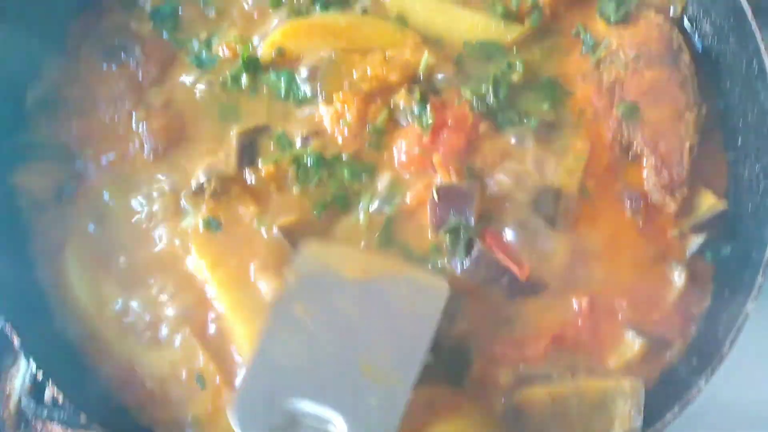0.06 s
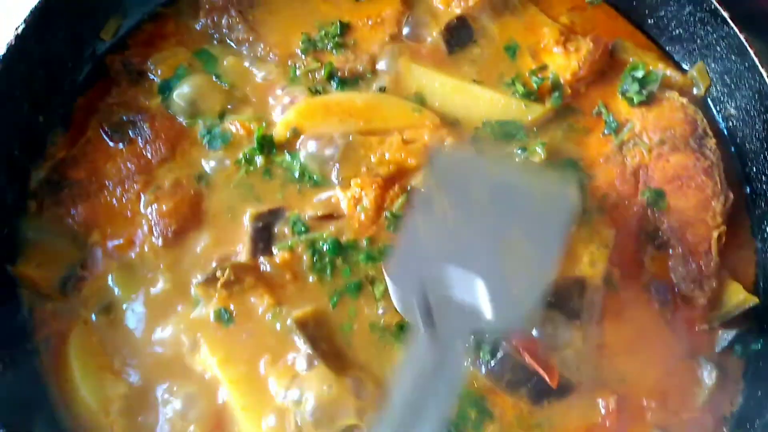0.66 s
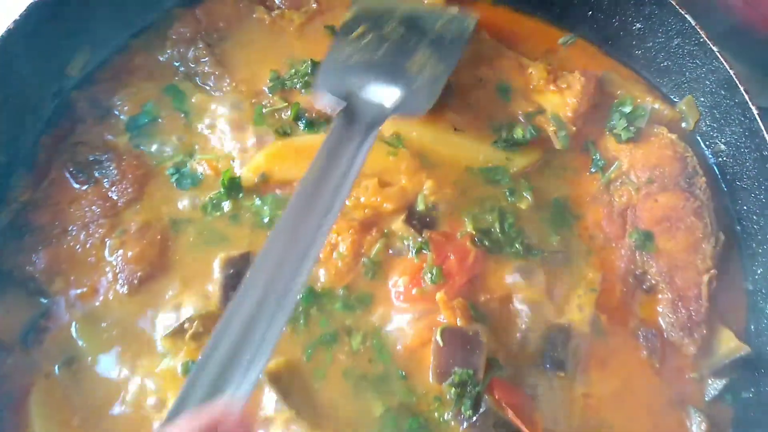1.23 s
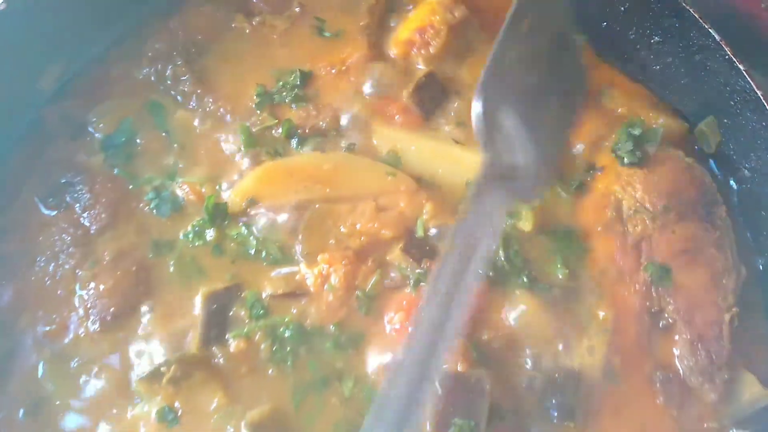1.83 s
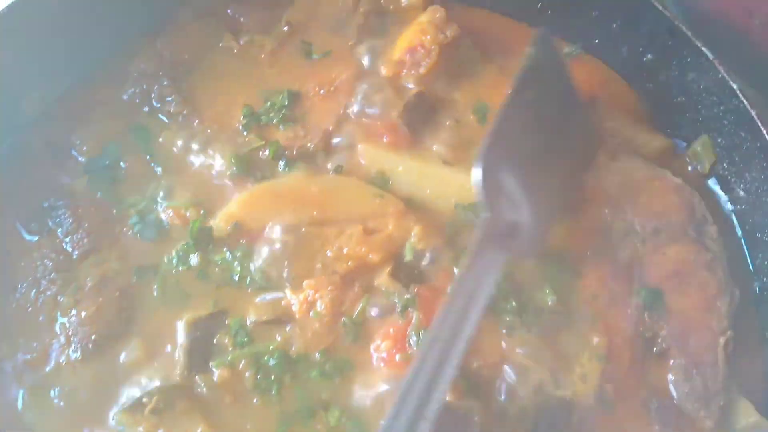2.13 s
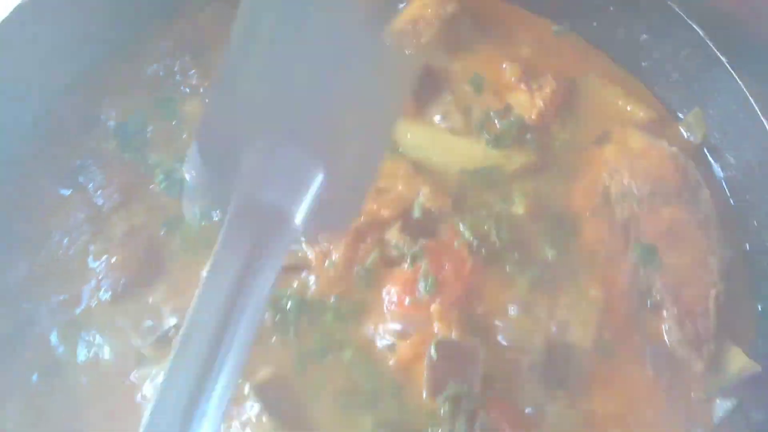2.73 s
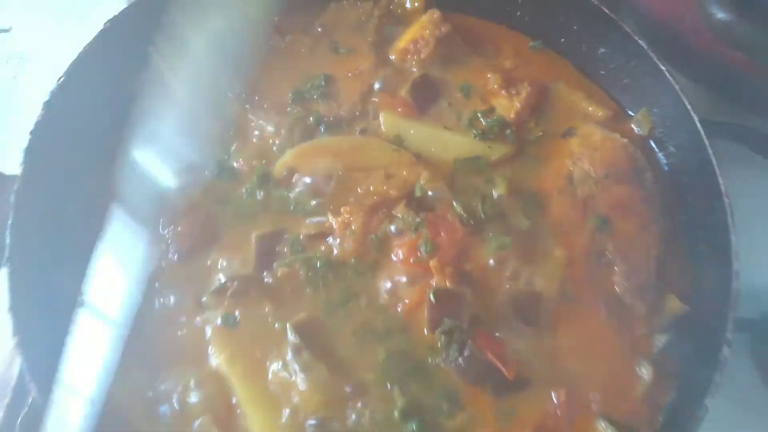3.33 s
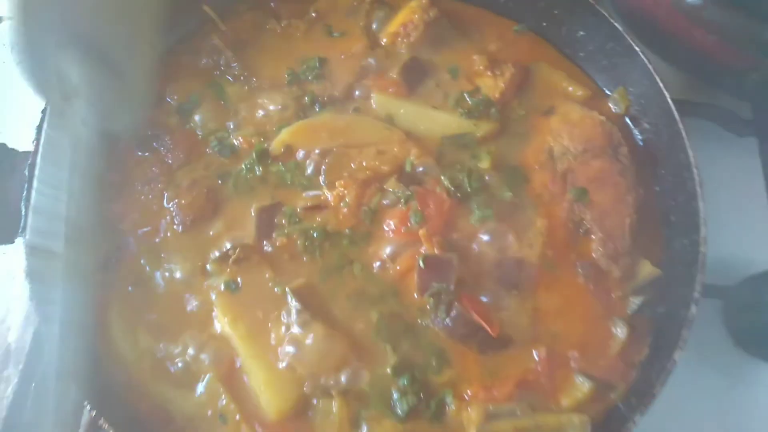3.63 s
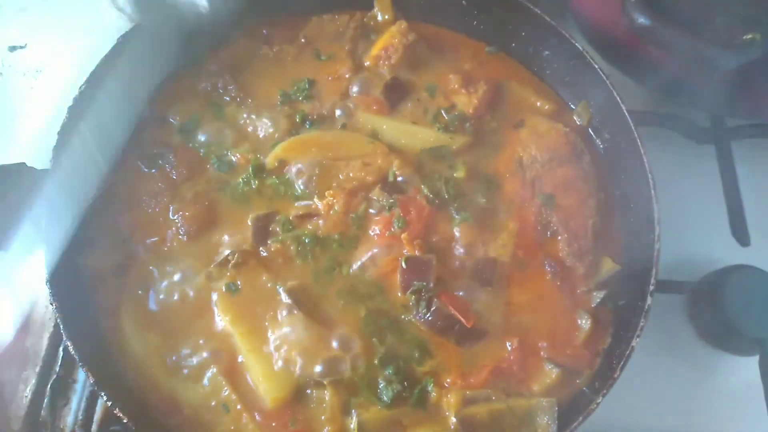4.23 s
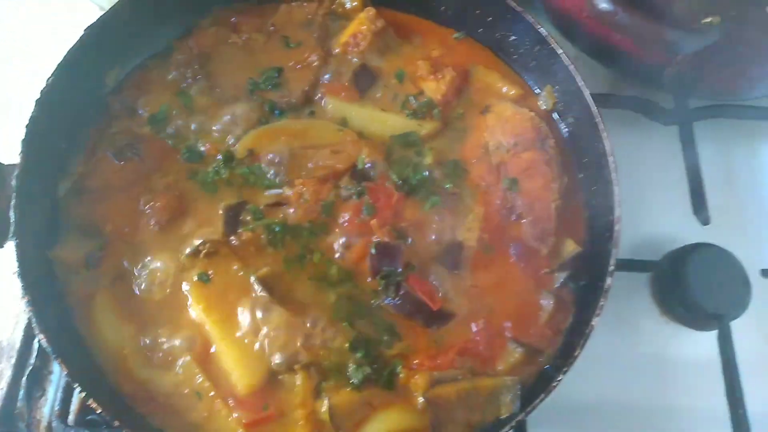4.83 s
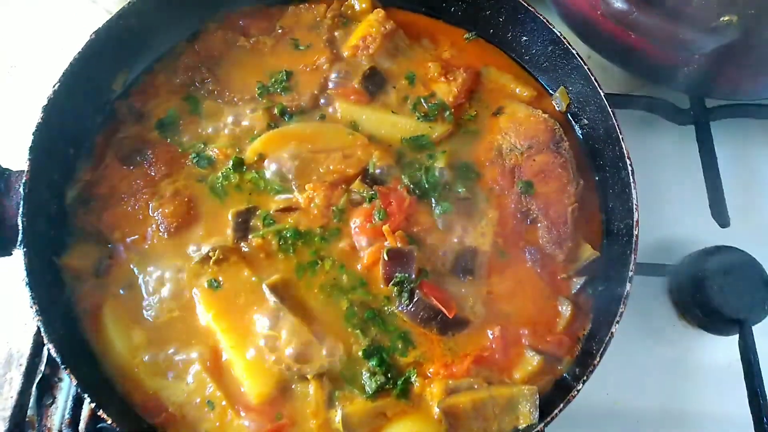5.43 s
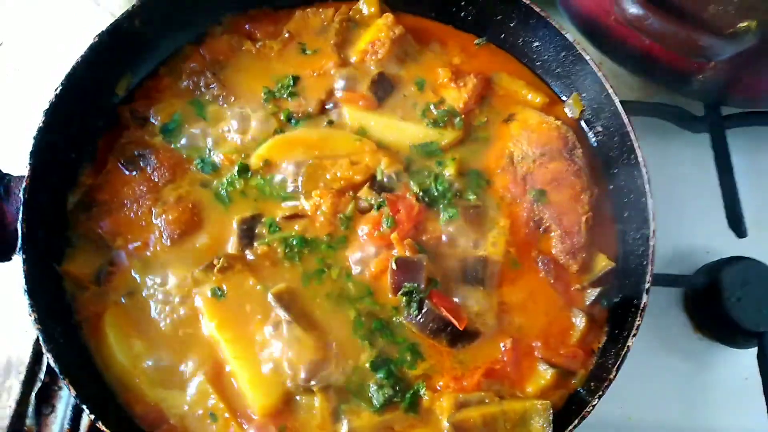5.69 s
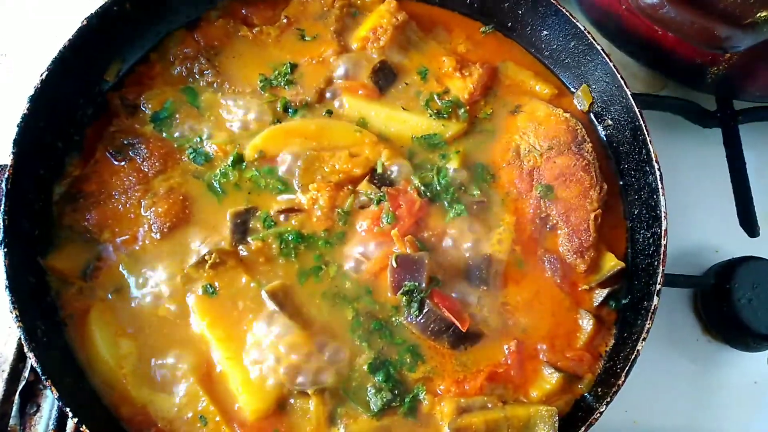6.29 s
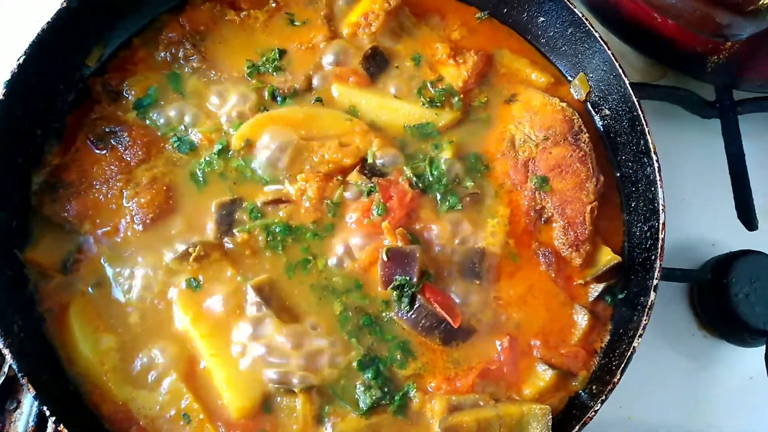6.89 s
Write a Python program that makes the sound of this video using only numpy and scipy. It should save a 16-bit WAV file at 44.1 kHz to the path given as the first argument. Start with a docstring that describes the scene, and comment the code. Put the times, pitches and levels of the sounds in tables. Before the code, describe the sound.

A thin curry simmers in a frying pan in a small kitchen, heard close on a hand-held microphone. Bubbles pop softly in the sauce while droplets spit and fizz in oil at the hot rim. After about five seconds a steel spatula is put down with a loud ringing knock and settles with a lighter click. The sizzling carries on, and sauce sputters loudly on hot metal near the end.

```python
"""Sizzling, spitting and soft bubbling: a thin curry simmers in a frying pan in a small kitchen.
Bubbles burst in the sauce while water spits and fizzes in the oil at the hot rim.
A steel spatula is put down with a ringing knock and settles. Sauce runs onto hot metal and sputters,
mildly near the start and loudly near the end. A hand-held microphone listens from close by,
through two openings (ports), left and right."""
import sys
import numpy as np
from scipy import signal
from scipy.fft import rfft, irfft
from scipy.io import wavfile

SR = 44100
rng = np.random.default_rng(int(sys.argv[2]) if len(sys.argv) > 2 else 0)


def log_audio(samples):
    """Write samples as a 16-bit WAV file to the path given in sys.argv[1]."""
    # one column per channel
    frames = np.atleast_2d(samples).T
    # limit to full scale, then quantise
    limited = np.clip(frames, -1, 1)
    pcm = np.round(limited * 32767).astype(np.int16)
    wavfile.write(sys.argv[1], SR, pcm)


N = 306484
BINS = np.fft.rfftfreq(1024, 1 / SR)  # the frequencies in Hz at which tone colours are drawn

# Three tone colours. Each row: frequency in Hz, relative level in dB.
FRYING_COLOUR = [(2000, -50.5), (4400, -21), (5300, -5.5), (6500, -0.5), (7600, 1.5), (9200, -1),
                 (10500, -5.5), (12000, -37.5), (16000, -35)]  # water frying in oil
BRIGHT_COLOUR = [(8000, -40), (11000, -2), (13000, -8.5), (15800, -12.5)]  # steam and fine droplets
SAUCE_COLOUR = [(88, -38), (150, -2), (322, -6), (451, 2), (554, -2.5), (764, 5.5), (1170, -3), (1340, 3.5),
                (2860, -3.5), (4070, -12), (4580, -29), (5000, -5.5), (6500, -30), (11000, -120)]  # bubbling sauce


def amp(db):
    """Turn decibels into a gain to multiply by."""
    return 10 ** (np.asarray(db) / 20)


def unit_power(x):
    """Scale x so that its average power is 1."""
    return x / np.sqrt(np.mean(x ** 2) + 1e-20)


def value_at(points, hz):
    """Look up a frequency between the rows of a table."""
    frequencies, values = np.transpose(points)
    return np.interp(np.log(hz + 1), np.log(frequencies + 1), values)


def level(curve):
    """Join points of (seconds, dB) into a gain for every sample."""
    return amp(np.interp(np.arange(N) / SR, *np.transpose(curve)))


def seconds(length):
    """The time of each sample in a sound this long."""
    return np.arange(int(length * SR)) / SR


def add(mix, start_s, sound):
    """Add a sound to the mix at the given time."""
    start = round(start_s * SR)
    part = mix[:, max(start, 0):][:, :sound.shape[1]]
    part += sound[:, :part.shape[1]]


def convolve(x, response):
    """Let every sample of x set off the response, keeping the length of x."""
    return signal.fftconvolve(np.atleast_2d(x), np.atleast_2d(response), axes=1)[:, :np.shape(x)[-1]]


def colour_gains(colour):
    """Turn a tone colour into gains with an average power of 1."""
    return unit_power(amp(value_at(colour, BINS)))


def sharp_click(gains):
    """The sharpest click that has these gains across its frequencies."""
    cepstrum = irfft(np.log(gains + 1e-5))
    half = cepstrum.shape[-1] // 2
    cepstrum[..., 1:half] *= 2  # these two steps move the energy to the start
    cepstrum[..., half + 1:] = 0
    return irfft(np.exp(rfft(cepstrum)))


def wander(swing_db, per_s):
    """A gain that drifts to a new random value per_s times a second."""
    steps = np.arange(N) / SR * per_s
    return amp(swing_db * np.interp(steps, np.arange(400), rng.standard_normal(400)))


def clicks(size, per_s, spread_db):
    """Random clicks, most small and a few large."""
    chance, height, sign = rng.random((3, size))
    height = np.minimum(-np.log(1 - height), 4)
    return unit_power((chance < per_s / SR) * amp(spread_db * height) * np.sign(sign - .5))


def ports(pan_db, hz):
    """Left and right gains: the housing shades the treble from one port. Positive pan_db leans left."""
    # The housing's shadow. Each row: frequency in Hz, multiplier for pan_db.
    shadow = [(2400, 0.026), (4400, 1.85), (7000, 2.17), (9200, 0.71), (12000, 0)]
    ratio = amp(pan_db * value_at(shadow, hz))
    return np.sqrt(2) * np.array([ratio, np.ones_like(ratio)]) / np.hypot(ratio, 1)


def echoes(near_db, room_db, near_fade_s=0.018, room_fade_s=0.21):
    """The paths from one random spot: direct sound, echoes off pan and hob, then the kitchen."""
    t = seconds(.2)
    reflections = rng.standard_normal((2, len(t))) * (rng.random((2, len(t))) < .15) * (t > .0007)
    near = reflections * 1e-3 ** (t / near_fade_s)
    room = reflections * 1e-3 ** (t / room_fade_s) * (t > .005)
    paths = sum(amp(db) * p / np.linalg.norm(p[0]) for db, p in ((near_db, near), (room_db, room)))
    paths[0, rng.integers(2, 9)] += 1  # the direct sound reaches the left a few samples late
    paths[1, 0] += 1
    return paths


def noise(size, colour, pan_db, fade_times=None):
    """Coloured noise at both ports; with fade_times each band dies away at its own speed."""
    # How alike the two ports sound. Each row: frequency in Hz, likeness from 0 to 1.
    likeness = [(60, 0.78), (150, 0.9), (640, 0.91), (1400, 0.06), (3000, 0.12)]
    hz, t, (left, other) = signal.stft(rng.standard_normal((2, size)), SR, nperseg=1024)
    same = np.clip(value_at(likeness, hz), 0, 1)[:, None]
    right = same * left + np.sqrt(1 - same ** 2) * other
    bands = np.array([left, right]) * (colour_gains(colour) * ports(pan_db, hz))[:, :, None]
    if fade_times is not None:
        bands *= 0.00082 ** (t / value_at(fade_times, hz)[:, None])
    return signal.istft(bands, SR, nperseg=1024)[1][:, :size]


def kitchen():
    """The quiet hush of the room over an unsteady low rumble."""
    # Tone colours of hush and rumble. Each row: frequency in Hz, relative level in dB.
    hush_colour = [(60, -20), (100, -6), (170, 7), (340, -13), (450, -2), (560, -7), (780, 0), (1000, -12),
                   (2300, -10), (4500, -24), (16000, -40)]
    rumble_colour = [(20, -38), (35, 2), (50, 1.5), (65, -13), (90, -19.5), (200, -30), (600, -62)]
    # The rumble's trend, in two stretches. Each row: time in seconds, relative level in dB.
    trend = [
        [(0.0, -71.5), (0.75, -60), (0.78, -68), (4.7, -77)],
        [(5.4, -67), (6.502, -75.5), (6.59, -60), (6.95, -73)],
    ]
    hush = amp(-64.5) * noise(N, hush_colour, pan_db=3.5)
    rumble = level(np.vstack(trend)) * wander(swing_db=1, per_s=6) * noise(N, rumble_colour, pan_db=-9)
    return hush * amp([[-1], [1]]) + amp(7) * rumble * amp([[-2.3], [2.3]])


def bubble(hz, cycles, glide):
    """The hollow of a bubble rings briefly, its pitch rising as it opens."""
    t = seconds(.03)
    age = t * hz / cycles
    pitch = hz * (1 + glide * np.tanh(age / 2))
    return np.sin(2 * np.pi * np.cumsum(pitch) / SR) * np.exp(-age) * (1 - np.exp(-4 * t * hz))


def simmer(sizes=20):
    """Small bubbles burst in clusters, each size at its own spot in the sauce."""
    # How hard the sauce bubbles. Each row: time in seconds, relative level in dB.
    strength = [(0.0, -62.5), (0.37, -53.5), (0.81, -59.5), (3.29, -57.5), (3.64, -63.5), (6.95, -59.5)]
    out, clusters = np.zeros((2, N)), wander(swing_db=3.5, per_s=14)
    for hz in np.geomspace(260, 5000, sizes):
        ring = convolve(echoes(near_db=-1, room_db=-3), bubble(hz, cycles=2.4, glide=.12))
        bursts = convolve(clusters * clicks(N, per_s=32, spread_db=3.7), ring)
        out += amp(value_at(SAUCE_COLOUR, hz)) * np.sqrt(hz) * unit_power(bursts)
    return amp(4) * level(strength) * unit_power(out)


def pops(followers_fade_s=.016):
    """A large bubble's skin tears with a wet slap, its hollow rings, and smaller bubbles follow."""
    # Each row: start in seconds, relative level in dB, pitch in Hz, followers' relative level in dB.
    large_bubbles = [(.004, -32, 1460, -11.5), (.181, -35, 1760, -25), (0.193, -43.5, 374, -4.5),
                     (.347, -40.5, 770, -14), (0.433, -37, 2020, -19), (.545, -47.5, 507, -3.5),
                     (0.599, -33.5, 1480, -24), (.617, -33, 2150, -11.5), (.962, -38.5, 920, -4.5),
                     (1.244, -43.5, 464, -9), (1.3, -41.5, 670, -8.5), (1.844, -39, 1080, -24),
                     (1.854, -36, 1210, -17), (1.943, -45, 910, -13), (2.073, -48, 1100, -2),
                     (2.204, -46, 820, -1), (2.456, -38.5, 1200, -2), (2.477, -30, 1460, -11),
                     (2.714, -38, 1030, -4.5), (2.9207, -26.5, 1830, -19), (2.95, -36.5, 1540, -22),
                     (3.042, -34, 1270, -20), (3.209, -35.5, 1900, -6.5), (3.573, -46.5, 713, -3),
                     (4.055, -39.5, 1330, -21), (4.104, -43, 1110, -5.5), (4.19, -39, 2330, -15),
                     (4.503, -37.5, 2660, -29), (4.663, -43.5, 1500, -13), (5.769, -39, 2230, -10),
                     (5.97, -41, 1300, -16), (6.142, -51.5, 890, -8.5), (6.224, -34.5, 2490, -14)]
    out, t = np.zeros((2, N)), seconds(.15)
    for start, db, hz, followers_db in large_bubbles:
        slap = bubble(1600, cycles=.8, glide=.1)
        plop = bubble(hz, cycles=2, glide=.1) + slap
        rings = [bubble(hz * ratio, cycles=1, glide=.12) for ratio in (.72, 1.05, 1.6)]
        followers = sum(convolve(clicks(len(t), per_s=350, spread_db=2.5), ring)[0] for ring in rings)
        sound = amp(followers_db - 1.5) * unit_power(followers) * np.exp(-t / followers_fade_s)
        sound[:len(plop)] += 1.245 * plop / abs(plop).max()
        muffle = signal.butter(6, max(2700, 1.4 * hz), fs=SR, output="sos")  # thick sauce dulls it
        muffled = signal.sosfilt(muffle, amp(db) * sound)
        add(out, start, convolve(muffled, echoes(near_db=-2, room_db=-7)))
    return out


def steam_burst(bright_db, dull_db, pan_db, hz, width_hz=450):
    """One tiny burst of steam in oil; its hollow rings near hz."""
    # The dull tone of fat droplets. Each row: frequency in Hz, relative level in dB.
    dull_colour = [(900, -10), (2400, -2), (3600, 5.5), (5200, 3.5), (8000, -42)]
    resonance = 1 / (1 + ((BINS - hz) / width_hz) ** 2)
    hollow = unit_power(colour_gains(FRYING_COLOUR) * (.3 + resonance))
    bright = amp(bright_db) * colour_gains(BRIGHT_COLOUR)
    dull = amp(dull_db) * colour_gains(dull_colour)
    return sharp_click(np.sqrt(hollow ** 2 + bright ** 2 + dull ** 2) * ports(pan_db, BINS))


def crackle(loudness, bright_db, dull_db, pan_db, hz, per_s, sizes=4):
    """A crowd of tiny bursts of several sizes, all following one loudness curve."""
    out = 0
    for pitch in hz * rng.uniform(.78, 1.25, sizes):
        ticks = loudness * clicks(len(loudness), per_s / sizes, spread_db=3.4)
        out += convolve(ticks, steam_burst(bright_db, dull_db, pan_db, pitch))
    return out / np.sqrt(sizes)


def sizzle(spots=8):
    """Spots on the rim fry, each with its own pitch and flare-ups, under a thin hiss of steam."""
    # How hard the rim fries, in two stretches. Each row: time in seconds, relative level in dB.
    strength = [
        [(0.0, -45.5), (0.63, -61), (2.36, -52.5), (2.42, -57), (4.7, -54)],
        [(5.45, -59), (5.69, -56.5), (5.832, -61), (6.14, -60), (6.3, -63)],
    ]
    frying = np.zeros((2, N))
    for hz in np.linspace(5700, 9500, spots):
        ticks = wander(swing_db=5, per_s=24) * clicks(N, per_s=80, spread_db=4.6)
        paths = echoes(near_db=-2, room_db=-6)
        burst = steam_burst(bright_db=-13.5, dull_db=-11.5, pan_db=6.5, hz=hz)
        frying += np.sqrt(amp(value_at(FRYING_COLOUR, hz))) * convolve(ticks, convolve(paths, burst))
    steam = convolve(clicks(N, per_s=2500, spread_db=13), sharp_click(colour_gains(BRIGHT_COLOUR)))
    steam = convolve(steam, echoes(near_db=-3, room_db=-16))
    frying = amp(2.5) * unit_power(frying * wander(swing_db=3, per_s=14))
    steam = amp(-19) * unit_power(steam * wander(swing_db=6, per_s=9.3))
    return level(np.vstack(strength)) * (frying + steam)


def spit(start, snap_db, fizz_db, hz, brightness_db):
    """A droplet snaps in the oil, snaps more weakly as it breaks up, and boils away in a fizz."""
    # Where the oil lies as the microphone moves. Each row: time in seconds, lean to the left in dB.
    direction = [(0, 6.5), (2.6, 10.5), (4.3, 9.5), (4.8, 4.5), (6.95, 2.5)]
    pan_db = np.interp(start, *np.transpose(direction))
    bright_db, dull_db = -24 + brightness_db, -24.5 - brightness_db
    rise_s, fade_s, second_snap_s = .0015, .16, .006
    t = seconds(.2)
    fizz_level = amp(fizz_db - 1 - 60 * t / fade_s) * (1 - np.exp(-t / rise_s))
    sound = crackle(fizz_level, bright_db, dull_db, pan_db, hz, per_s=1700, sizes=3)
    snap = steam_burst(bright_db - 5.5, dull_db - 4.5, pan_db, hz, width_hz=620)
    snap = amp(snap_db - 1) * snap / abs(snap).max(1).mean()
    add(sound, 0, snap)
    add(sound, second_snap_s * (.5 + rng.random()), amp(-9) * snap)
    return convolve(sound, echoes(near_db=-5, room_db=-31))


def spits(faint_count=20):
    """Water droplets spit in the hot oil: loud ones, with faint ones scattered between them."""
    # The loud droplets. Each row: start in seconds, relative snap and fizz levels in dB, pitch in Hz,
    # brightness in dB (above 0 for fine droplets, below 0 for fat ones).
    loud = [(0.0923, -18, -38, 7300, 15), (0.1062, -11, -35, 8260, 6), (.175, -24, -41, 8700, 8),
            (0.1881, -20, -37, 7240, 16), (.217, -20, -40, 8000, 5), (0.2822, -28, -40.5, 7200, -18),
            (.385, -25.5, -34, 6540, 1), (0.633, -30, -40, 7600, 3), (.657, -25, -47, 8700, 6),
            (0.8053, -28, -42.5, 7230, -20.5), (0.863, -25, -43.5, 7200, -15.5),
            (1.0086, -26, -39.5, 7230, 14), (1.0658, -25, -47.5, 8180, 22), (1.1817, -27.5, -43, 7800, 7),
            (1.316, -33, -44.5, 6800, -8), (1.3888, -21, -40, 8240, 19.5), (1.466, -27.5, -47.5, 7960, 18),
            (1.529, -31, -44, 7260, 2), (1.5861, -17, -36.5, 8540, 7), (1.6264, -30, -42, 7960, 23.5),
            (1.6751, -23.5, -59, 7700, 21), (1.7866, -21.5, -38.5, 7100, -6),
            (1.808, -19.5, -49, 10400, 16), (2.1014, -32, -39.5, 7900, 8), (2.2091, -29, -40, 6760, -20.5),
            (2.351, -29, -43, 7360, 5), (2.377, -21, -44.5, 8300, 15), (2.439, -30, -37.5, 7800, 2),
            (2.7042, -24, -41, 7400, 3), (2.7454, -20, -38, 7250, 4), (2.9833, -21, -52, 7940, 10),
            (3.0502, -42, -37, 9300, 15), (3.1203, -17.5, -44, 8340, 19.5), (3.2728, -23.5, -43, 8400, 16),
            (3.412, -10.5, -31, 8070, 12), (3.601, -38, -37.5, 7500, 18), (3.6583, -21, -48, 7100, 0),
            (3.7648, -18, -42.5, 7140, -20.5), (3.7794, -20, -36, 6960, 13), (3.921, -24.5, -58, 8500, 26),
            (4.0565, -24.5, -51, 6800, -8), (4.0978, -25, -57, 7200, 3), (4.375, -42, -42.5, 6560, -14),
            (4.422, -26, -40.5, 7150, 11), (4.5017, -47, -45.5, 6900, -23.5), (4.773, -19.5, -51, 9800, 27),
            (5.2561, -14.5, -39.5, 6250, -19.5), (5.364, -34, -45.5, 7450, 6), (5.476, -30, -47, 7850, 15),
            (5.8675, -24, -36, 7800, 9), (6.362, -23, -41, 8550, 16), (6.3974, -33, -40.5, 7860, -15),
            (6.4317, -16.5, -39.5, 8700, -6), (6.6279, -12.5, -31.5, 7840, -17.5),
            (6.6927, -23, -38, 8140, 5), (6.813, -26.5, -49, 8040, 14)]
    snap_db, fizz_db, pitch_hz = -35, -48.5, 7460  # a typical faint droplet
    times = (np.arange(faint_count) + rng.random(faint_count)) / faint_count * N / SR
    scatter = rng.standard_normal((faint_count, 3)) * [1.5, 710, 9]
    faint = [(start, snap_db + db, fizz_db + db, pitch_hz + hz, brightness_db)
             for start, (db, hz, brightness_db) in zip(times, scatter)]
    out = np.zeros((2, N))
    for start, *droplet in faint + loud:
        add(out, start, spit(start, *droplet))
    return out


def sputters():
    """Sauce hits hot metal: crackle swells and dies over a gurgle, and the wet metal fries on briefly."""
    # Each row: time of the peak in seconds, level in dB, rise in seconds, seconds to fade by 60 dB,
    # pitch in Hz, then bright part, dull part, lean to the left and gurgle, all in relative dB.
    spills = [(0.456, -25, 0.01, 0.063, 6260, -11, -11, 9, -54),
              (6.573, -15.5, 0.0051, 0.15, 8800, -13.5, -28, 4, -53)]
    lead_s, linger_db, linger_fade_s = .06, -19.5, .4
    out, t = np.zeros((2, N)), seconds(.59) - lead_s
    for peak_s, db, rise_s, fade_s, hz, bright_db, dull_db, pan_db, gurgle_db in spills:
        onset, age = np.exp(np.minimum(t, 0) / rise_s), np.maximum(t, 0)
        swell = onset * amp(-60 * age / fade_s)
        linger = onset * amp(linger_db - 60 * age / linger_fade_s)
        burst = crackle(amp(db) * swell, bright_db, dull_db, pan_db, hz, per_s=4700, sizes=16)
        frying = crackle(amp(db) * linger, bright_db=-14, dull_db=-15, pan_db=pan_db, hz=7460, per_s=570)
        sound = convolve(burst + frying, echoes(near_db=-7, room_db=-16))
        gurgle_level = amp(gurgle_db) * (np.sqrt(swell) + amp(17.5) * linger)
        gurgle = gurgle_level * noise(len(t), SAUCE_COLOUR, pan_db=-16)
        add(out, peak_s - lead_s, sound + gurgle)
    return out


def steel_ring(tones, rise_s, pan_db, tilt_db):
    """Struck steel rings with dying tones; a harder blow is brighter (tilt_db per octave)."""
    t = seconds(.6)
    hz, db, fade_s = np.transpose(tones)[:, :, None]
    phase = 2 * np.pi * (hz * t + rng.random(hz.shape))
    lag = np.array([2 * np.pi * np.minimum((hz / 1400) ** 2, .25), 0 * hz])  # high tones lag on the left
    fade = amp(db + tilt_db * np.log2(hz / 5000) - 60 * t / fade_s)
    return (ports(pan_db, hz) * fade * np.sin(phase - lag)).sum(1) * (1 - np.exp(-t / rise_s))


def spatula():
    """The steel spatula knocks down and rings, then settles with a ping, a rattle and a soft thud."""
    # Tone colours of knock and thud. Each row: frequency in Hz, relative level in dB.
    knock_colour = [(30, -39), (55, -22), (90, 8.5), (150, -5), (250, 1.5), (340, -20), (450, -9),
                    (750, -4), (1050, -3), (1900, -12), (2700, -2), (4200, -5.5), (7500, -7.5),
                    (10000, -14.5), (11500, -25.5), (16000, -39)]
    thud_colour = [(24, -41), (40, 0), (130, -1), (226, -20), (436, -14), (745, -17.5), (841, -18.5),
                   (1540, -14.5), (2500, -35), (3250, -72), (5500, -120)]
    # How the knock dies away. Each row: frequency in Hz, seconds to fade by about 60 dB.
    knock_fades = [(80, 0.22), (300, 0.24), (1000, 0.16), (3000, 0.11), (8000, 0.13), (15000, 0.3)]
    # The steel's tones when struck and when it lies down.
    # Each row: pitch in Hz, relative level in dB, seconds to fade by 60 dB.
    struck_tones = [(183, -3, 0.17), (431, -21, 0.16), (743, -17, 0.13), (883, -21, 0.12),
                    (2616, -12, 0.08), (2939, -9, 0.15), (3165, -18, 0.18), (3628, -30, 0.16),
                    (4210, -35, 0.15), (4560, -21, 0.079), (4958, 0, 0.11), (5486, -36, 0.15),
                    (6019, -27, 0.15), (7289, -22, 0.14), (7467, -3, 0.14), (7547, -14, 0.13),
                    (7617, -32, 0.2), (8021, -25, 0.15), (8559, -38, 0.15), (8850, -32, 0.14),
                    (9345, -36, 0.15), (9733, -36, 0.16), (10080, -29, 0.1)]
    lying_tones = [(135, -8, 0.29), (452, -17, 0.48), (7052, -14, 0.34), (7483, -5, 0.2), (7693, 0, 0.41),
                   (8064, -9, 0.28), (8554, -15, 0.36), (8882, -7, 0.22), (9760, -17, 0.33),
                   (10100, -23, 0.34)]
    out, t = np.zeros((2, N)), seconds(.6)
    knock = noise(len(t), knock_colour, pan_db=1, fade_times=knock_fades) * (1 - np.exp(-t / .00016))
    add(out, 4.8425, amp(-13) * knock)
    add(out, 4.843, amp(-2.5) * steel_ring(struck_tones, rise_s=.005, pan_db=11, tilt_db=1.8))
    add(out, 5.061, amp(-27) * steel_ring(lying_tones, rise_s=.002, pan_db=10, tilt_db=1.6))
    tap_level = (1 - np.exp(-t / .0045)) * np.exp(-t / .0042)
    tap = crackle(tap_level, bright_db=-13, dull_db=-31, pan_db=0, hz=7800, per_s=22000, sizes=10)
    rattle_level = np.exp(-t / .079)
    rattle = crackle(rattle_level, bright_db=-17.5, dull_db=-37, pan_db=5.5, hz=7630, per_s=260, sizes=8)
    add(out, 5.060, convolve(amp(-13) * tap + amp(-32) * rattle, echoes(near_db=-5.5, room_db=-11)))
    thud = noise(len(t), thud_colour, pan_db=-2) * np.exp(-((t - .043) / .032) ** 2)
    add(out, 5.062, amp(-40) * thud)
    return out


def scene():
    """Mix the room, the frying rim, the bubbling sauce and the spatula."""
    room = kitchen()
    frying = sizzle() + spits() + sputters()
    sauce = (simmer() + pops()) * amp([[-.6], [.6]])  # a little to the right
    return room + frying + sauce + spatula()


def record(dry):
    """Overload rounds off the knock; the recorder drops the deepest bass and the highest treble."""
    ceiling, low_cut_hz, high_cut_hz = 0.85, 40, 16000
    rounded = ceiling * np.tanh(dry / ceiling)
    bass_cut = signal.butter(3, low_cut_hz, "highpass", fs=SR, output="sos")
    treble_cut = signal.firwin(255, high_cut_hz, window=("kaiser", 8), fs=SR)
    return signal.oaconvolve(signal.sosfilt(bass_cut, rounded), treble_cut[None], "same")


dry = scene()
out = record(dry)
log_audio(out)
```